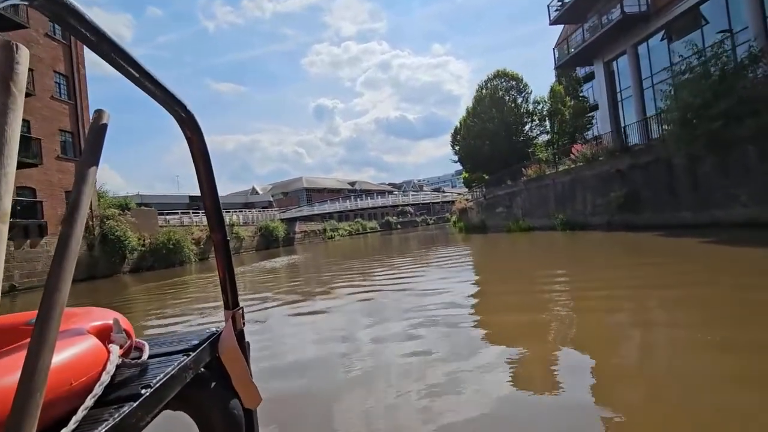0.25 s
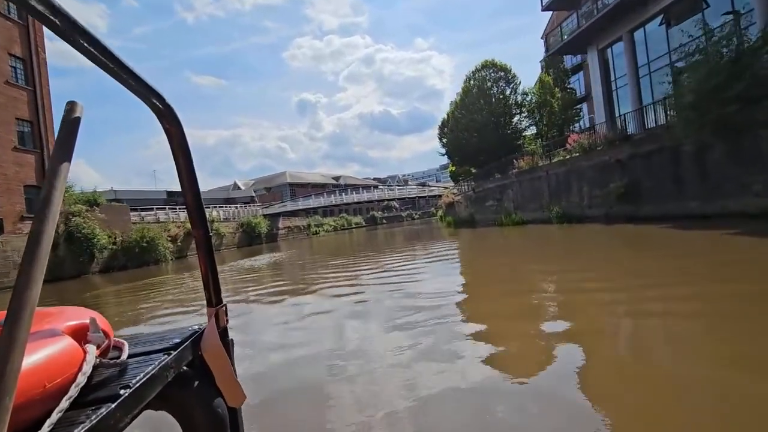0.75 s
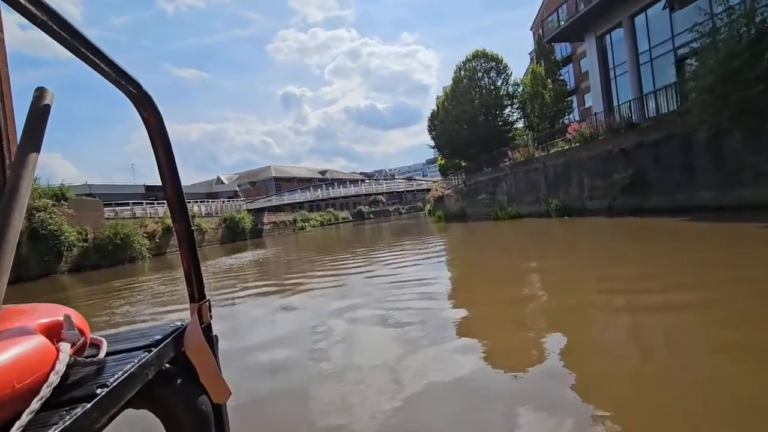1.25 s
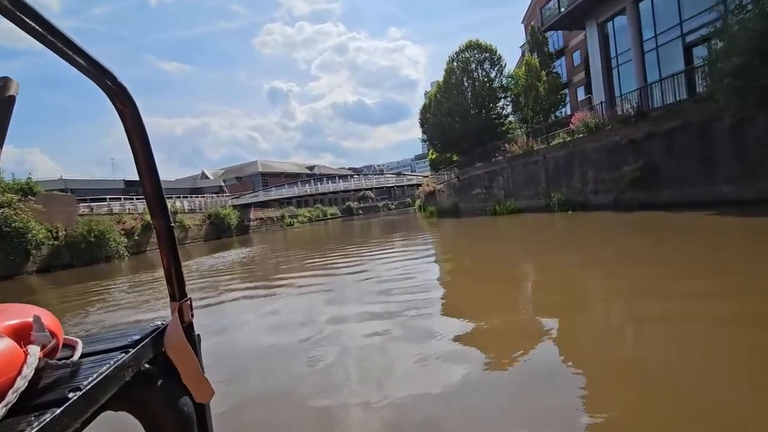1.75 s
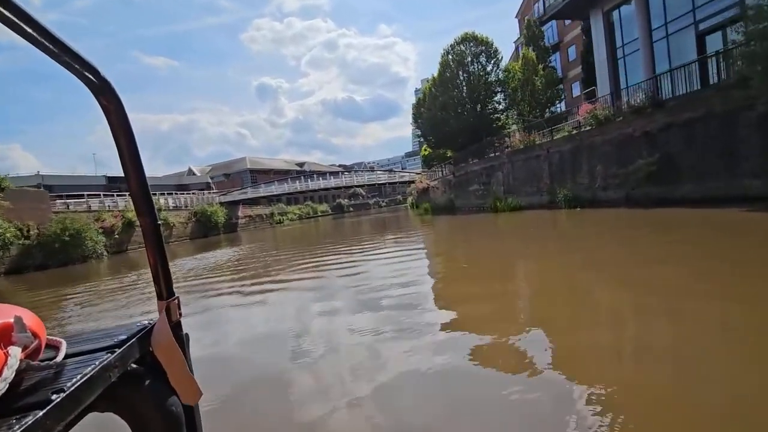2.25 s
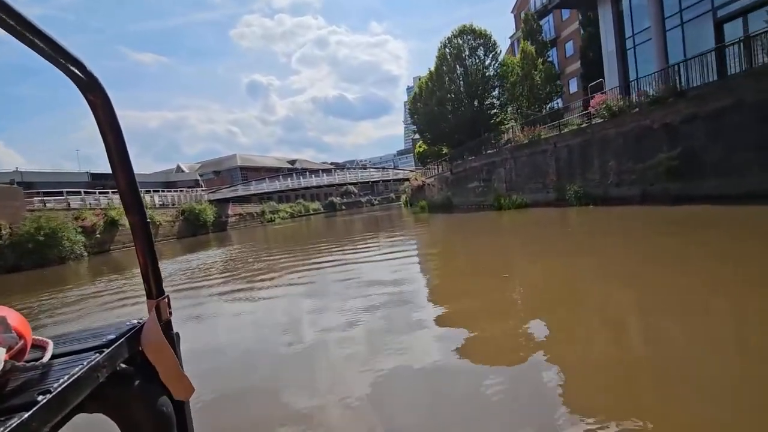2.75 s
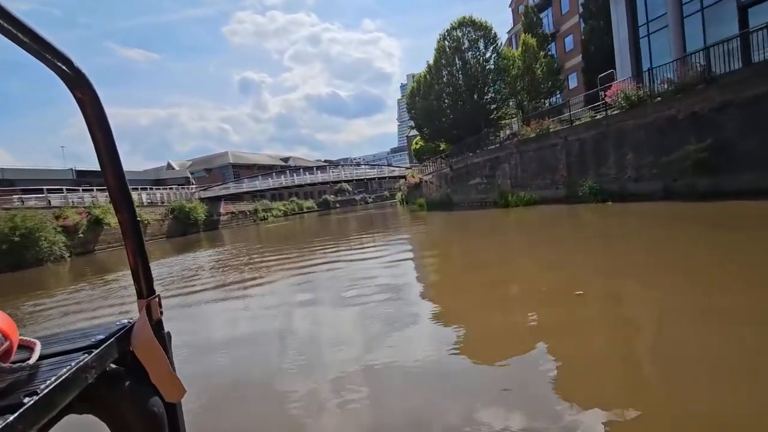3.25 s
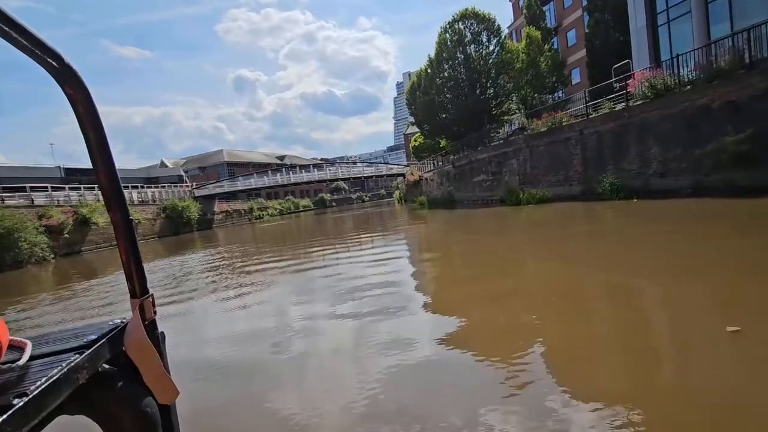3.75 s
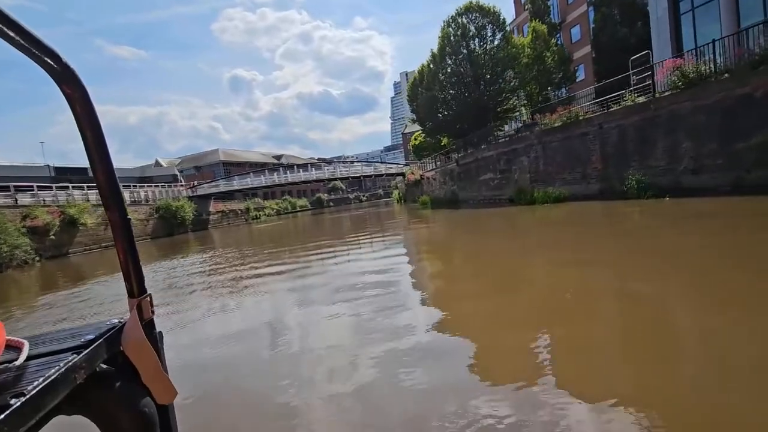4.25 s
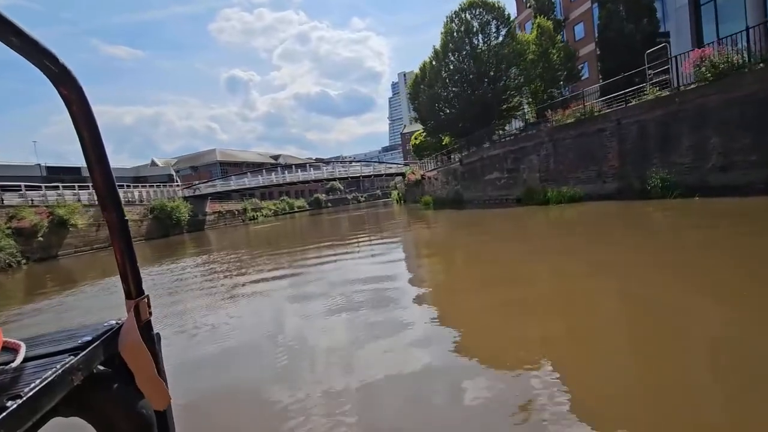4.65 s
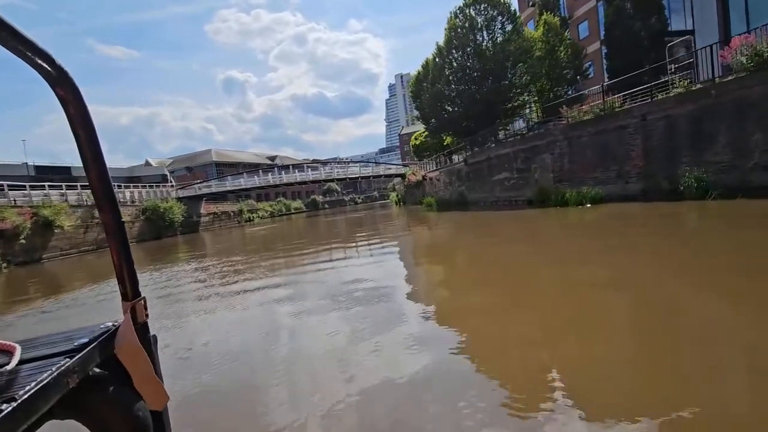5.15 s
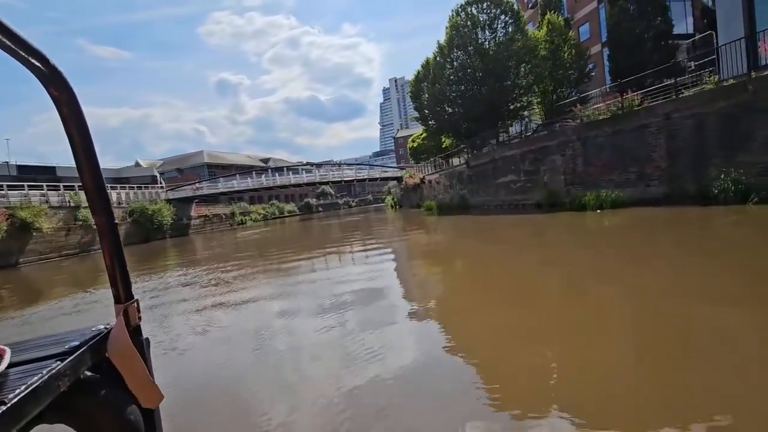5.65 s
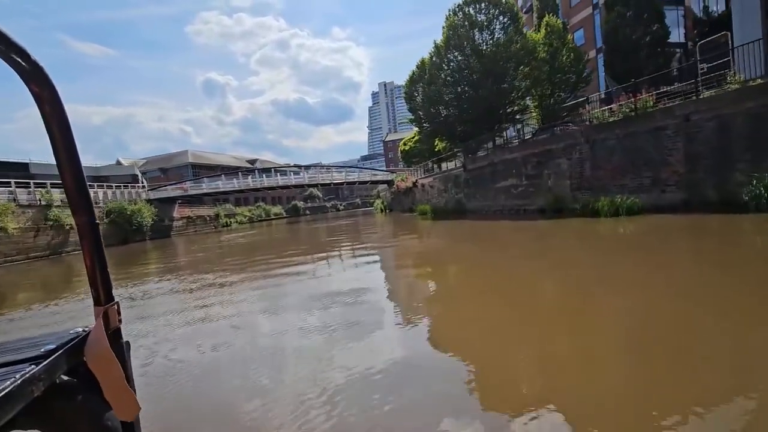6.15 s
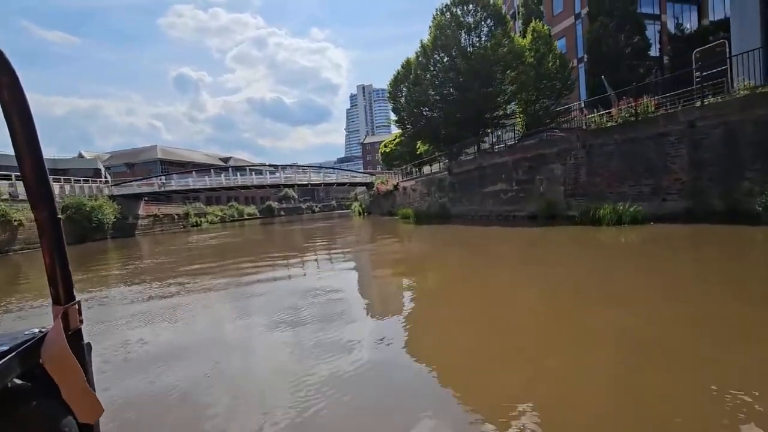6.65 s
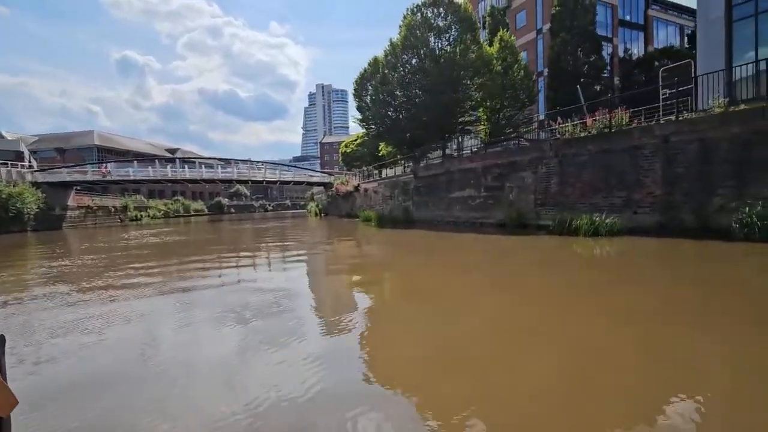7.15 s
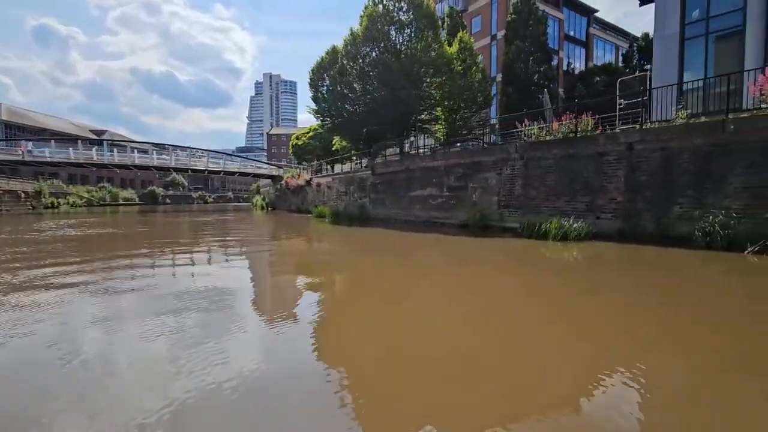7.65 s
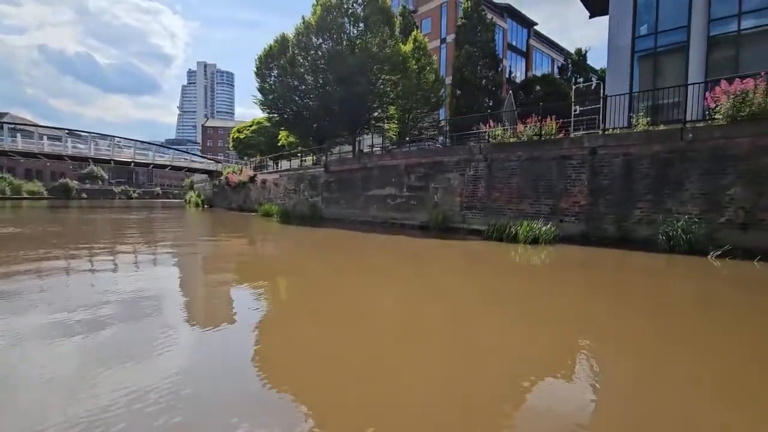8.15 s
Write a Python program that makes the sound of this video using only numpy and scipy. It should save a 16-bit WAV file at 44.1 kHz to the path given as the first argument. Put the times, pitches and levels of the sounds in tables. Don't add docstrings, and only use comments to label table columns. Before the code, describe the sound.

Small diesel boat engine throbbing deeply, swelling in waves for two seconds, then thinning to a steady low chug under water wash and breeze.

```python
import sys
import numpy as np
from scipy import signal
from scipy.fft import rfft, irfft
from scipy.io import wavfile
from scipy.ndimage import uniform_filter1d, minimum_filter1d

SR = 44100
rng = np.random.default_rng(int(sys.argv[2]) if len(sys.argv) > 2 else 0)


def store_wav(level_fs):
    pcm = np.round(np.clip(np.atleast_2d(level_fs), -1, 1) * 32767)
    wavfile.write(sys.argv[1], SR, pcm.T.astype(np.int16))


def makeup_ratio(level_db):
    decades = np.asarray(level_db, float) / 20
    return 10 ** decades


N = 370440

# (time [s], bass gain [dB])
BREEZE = [(0.0, -10), (2.5, -13.5), (3.4, -13.5), (4.0, -12), (5.5, -12.5), (6.5, -12), (8.4, -12)]
# (start [s], end [s], opening [0-1])
LULLS = [(0.0, 0.008, 0.2), (0.062, 0.764, 1.0), (0.834, 0.882, 0.5), (0.995, 1.112, 0.5),
         (1.078, 1.506, 1.04), (1.56, 1.876, 1.0), (1.95, 2.465, 0.92), (3.822, 3.878, 0.1),
         (4.036, 4.113, 0.41), (5.17, 5.24, 0.15), (6.28, 6.378, 0.1), (7.32, 7.39, 0.07),
         (8.12, 8.40, 0.16)]
# (time [s], strength [dB], half length [s])
GUSTS = [(0.17, 3.5, .02), (0.595, 5.5, 0.028), (0.67, 3.5, .03), (0.84, 13, 0.01), (1.66, 3.5, 0.012),
         (1.71, -1.5, 0.0095), (1.825, -5, 0.013), (1.846, 24, 0.0097), (2.56, 2, .025), (2.92, 3, .07),
         (3.22, 4, 0.097), (3.40, 4, 0.038), (4.33, 3, .07), (4.47, 8, 0.022), (4.57, 6, .035),
         (4.90, 2, 0.071), (5.27, 7, 0.036), (5.70, 3, .04), (5.95, 1.5, .07), (6.23, 4, 0.065),
         (6.49, 5, 0.049), (6.73, 2, .05), (7.10, 1.5, 0.054), (7.21, 5, 0.016), (7.76, 3, 0.079),
         (8.07, 2, .035)]
# (frequency [Hz], density [dB per Hz])
WIND_SPECTRUM = [(20, -24), (45, -3), (90, 0), (145, 4), (250, -0.5), (330, -12.5), (500, -11.5),
                 (900, -51), (2000, -70)]
# (time [s], peak [dB], side [above 0 left])
PUFFS = [(0.242, -15, 1.9), (0.345, -17, -1.6), (0.401, -17, -1), (0.493, -16, 15), (0.559, -22, -2.6),
         (0.754, -22, 2.0), (0.836, -21, 1.5), (1.231, -17, 0), (1.499, -13, 5.1), (1.652, -28, -3),
         (1.684, -13.5, 8), (1.719, -13.5, 10.2), (1.749, -21, 1.1), (1.821, -13, 9), (1.834, -16, 16),
         (1.847, -12, 9), (1.862, -25, 6.0), (2.084, -19, 4.1), (2.121, -14, 7.1), (2.152, -18, 2.1),
         (2.185, -19, 1.7), (2.379, -10, 8.4), (2.412, -17, 4.8), (2.442, -20, 6.4), (2.475, -20, -2)]
# (time [s], loss of side [dB], half length [s])
SNAPS = [(0.03, 12, 0.037), (2.55, 9, 0.052), (2.83, 32, 0.036), (3.06, 28, 0.05), (3.39, 26, 0.05),
         (3.88, 30, 0.035), (4.14, 16, .03), (4.49, 8, .03), (4.78, 12, 0.027), (4.96, 7, 0.031),
         (5.16, 14, 0.067), (5.32, 17, 0.045), (5.48, 13, 0.091), (5.76, 16, 0.028), (6.10, 12, 0.042),
         (6.62, 13, 0.065), (6.80, 17, 0.15), (7.06, 12, 0.064), (7.17, 22, 0.028), (7.32, 23, .025),
         (7.46, 16, 0.081), (7.92, 16, .05)]
# (time [s], rush level [dB])
WASH = [(0.0, -37), (2.4, -37.5), (2.9, -38.5), (3.3, -37), (4.25, -36.5), (5.3, -35.5), (5.7, -36.5),
        (6.3, -34.5), (6.75, -37), (6.9, -35), (7.15, -36.5), (7.3, -34.5), (8.2, -37), (8.4, -35.5)]
# (time [s], lift [dB], half length [s])
SLAPS = [
    (0.0, -1, 0.012),
    (2.57, 2.5, 0.061),
    (4.35, 1.5, 0.13),
    (5.54, 3, 0.026),
    (6.32, 4, 0.013),
    (6.42, 1, 0.031),
]
# (frequency [Hz], density [dB per Hz])
RUSH = [(60, 11), (115, 16), (170, -5), (260, 8), (340, -1), (500, -1), (900, -6.5), (1450, -5),
        (1800, -11), (2600, -23), (4000, -36)]
# (frequency [Hz], density [dB per Hz])
SPRAY = [(1400, -4), (2600, 0), (3500, 2.5), (5000, -2), (6200, -5.5), (9000, -9.5), (12000, -12),
         (15800, -14)]
# (frequency [Hz], likeness [0-1])
LIKENESS = [(60, 0.8), (300, 0.9), (640, 0.73), (1000, 0.93), (1410, 0), (3100, 0.016), (15000, 0)]
# (time [s], peak [dB], pitch [Hz], left-right [dB])
PLOPS = [(0.891, -28, 1060, -4.1), (0.998, -30.5, 770, -1), (1.382, -29, 1330, -2.0),
         (1.576, -33, 438, -1.4), (1.843, -28.5, 490, 13), (2.099, -29, 413, -1), (2.403, -36, 450, 1.3),
         (2.557, -27, 1120, 0), (2.798, -32, 1010, -1.3), (3.201, -30, 865, -1), (3.288, -27.5, 1080, -7),
         (3.309, -32, 1053, -1.9), (3.527, -31, 960, -1.6), (3.653, -31, 1250, -2.0),
         (4.353, -32, 695, -1.8), (5.051, -34, 740, -1.7), (5.112, -27.5, 770, -8),
         (5.113, -30, 1460, -4.1), (5.15, -30, 700, -1.4), (5.222, -30, 720, -5), (5.531, -28.5, 795, -6),
         (6.315, -36, 740, -2.2), (6.399, -31, 990, -0.3), (6.437, -27, 475, -2.0),
         (6.468, -27.5, 1010, -4.8), (6.93, -30.6, 570, -1.5), (7.297, -31.5, 810, -2.0),
         (8.115, -27.5, 736, 2), (8.260, -29, 1015, -1.5)]
# (time [s], peak [dB], pitch [Hz], left-right [dB])
DROPS = [
    (0.6774, -20, 4600, -1.0),
    (1.4616, -26, 3760, -1.0),
    (4.5216, -28, 3520, -1.0),
    (5.6101, -24, 3990, -9),
    (5.9618, -30, 3130, 3),
    (6.7196, -29, 3300, 2),
    (7.5118, -27, 3340, -4),
    (7.9997, -30, 3190, 0.0),
]
# (frequency [Hz], width [Hz], level [dB])
PANELS = [(838, 66, -46.5), (1146, 10, -53), (1375, 38, -55), (2010, 126, -48)]
# (time [s], level [dB])
WHINE = [(0.0, -54), (0.18, -52.5), (2.92, -55), (3.72, -52), (6.36, -50.5), (7.39, -54), (7.76, -73),
         (8.4, -61)]
# (time [s], four-stroke cycle rate [Hz])
SPEED = [(0, 12.606), (2.8, 12.601), (3.3, 12.615), (8.4, 12.612)]
# (multiple of cycle rate, level [dB])
EXHAUST = [(4, 1.5), (8, -1), (12, -29.5), (16, -27), (20, -22.5)]
# (multiple of cycle rate, level [dB])
ENGINE_SHAKE = [(3, -31), (5, -29), (6, -31), (7, -22), (9, -33),
                (17, -26), (18, -25.5), (19, -29), (21, -27), (23, -21.5), (24, -27), (25, -28), (27, -29),
         (28, -32), (31, -30.5), (33, -37)]

OPPOSED = np.array([[1], [-1]])
SPLIT_HZ, DUCK_HZ, FOLD_HZ = 223, 447, 1100


def rms_one(x):
    return x / np.sqrt(np.mean(x ** 2) + 1e-20)


def in_time(rows):
    s, *columns = np.transpose(rows)
    return [np.interp(np.arange(N) / SR, s, c) for c in columns]


def at_hz(points, hz):
    point_hz, value = np.transpose(points)
    return np.interp(np.log(hz), np.log(point_hz), value)


def bumps(rows, order=2):
    t = np.arange(0, N + 40, 40) / SR
    total_db = sum(db * np.exp(-((t - s) / half_s) ** order) for s, db, half_s in rows)
    return np.interp(np.arange(N) / SR, t, total_db)


def drift(rate_hz):
    r = np.exp(-80 * np.pi * rate_hz / SR)
    slow = signal.lfilter([1], [1, -2 * r, r * r], rng.standard_normal(N // 40 + 2002))[2000:]
    return np.interp(np.arange(N) / 40, np.arange(len(slow)), rms_one(slow))


def resonate(x, hz, width_hz):
    r = np.exp(-np.pi * width_hz / SR)
    zeros = np.array([1, 0, -1]) * (1 - r * r) / 2
    return signal.lfilter(zeros, [1, -2 * r * np.cos(2 * np.pi * hz / SR), r * r], x)


def below(x, hz):
    return signal.sosfiltfilt(signal.butter(3, hz, fs=SR, output="sos"), x)


def coloured(x, spectrum, span_hz):
    hz = np.maximum(np.arange(N // 2 + 1) * SR / N, 1)
    gain = makeup_ratio(at_hz(spectrum, hz))
    inside = np.sum(gain[(span_hz[0] < hz) & (hz < span_hz[1])] ** 2) / len(hz)
    return irfft(rfft(x) * gain, N) / np.sqrt(inside)


def banded(source, spectrum, span_hz, shared_db, own_db, rate_hz):
    together = drift(rate_hz) + 2.0 * drift(16.0 * rate_hz)
    first_hz, last_hz = spectrum[0][0], spectrum[-1][0]
    edges_hz = first_hz * 2 ** np.arange(0, np.log2(last_hz / first_hz) + .4, .5)
    out = 0
    for k, (low, high) in enumerate(zip(edges_hz, np.minimum(edges_hz[1:], 20000))):
        band = signal.butter(2, [low, high], "band", fs=SR, output="sos")
        mid, side = signal.sosfilt(band, source[k % 2])
        alike = np.clip(at_hz(LIKENESS, np.sqrt(low * high)), 0, .999)
        gain = makeup_ratio(shared_db * together + own_db * drift(3.5 * rate_hz))
        out = out + gain * (np.sqrt(1 + alike) * mid + np.sqrt(1 - alike) * side * OPPOSED)
    return coloured(out, spectrum, span_hz) / np.sqrt(2)


def duck_db():
    open_s, shut_s = 0.07, 0.074
    t = np.arange(N) / SR
    ramps = []
    for start, end, far in LULLS:
        ramp = np.minimum((t - start) / open_s, 1 - (t - end) / shut_s)
        ramps.append(far * np.clip(ramp, 0, 1))
    return in_time(BREEZE)[0] * (1 - np.max(ramps, axis=0)) - bumps(GUSTS)


def swell_db():
    return in_time(WASH)[0] + bumps(SLAPS)


def wind():
    calm_db, roar_per_db, lumpy_db = -41, 0.6031, 3.5
    buffet_db, buffet_hz = -3.5, 90
    noise = coloured(rng.standard_normal((3, N)), WIND_SPECTRUM, (20, 900))
    buffet = makeup_ratio(buffet_db) * rms_one(below(noise[2, ::-1], buffet_hz)) * OPPOSED
    roar_db = calm_db + roar_per_db * np.clip(-duck_db(), 0, 18.0) + lumpy_db * drift(5.6)
    out = makeup_ratio(roar_db) * (noise[:2] * makeup_ratio(1.5 * OPPOSED) + buffet)
    t = np.arange(-1200, 1200)
    for s, level_db, side in PUFFS:
        at = round(s * SR) + t
        puff = noise[2, at] * np.exp(-(t / SR / .009) ** 2)
        out[int(side < 0), at] += makeup_ratio(level_db - 1.5) * puff / np.abs(puff).max()
    return out


def rumble():
    band = signal.butter(2, [36, 95], "band", fs=SR, output="sos")
    noise = signal.sosfilt(band, rng.standard_normal(N))
    gust_db = -.8 * uniform_filter1d(duck_db(), size=9000)
    return makeup_ratio(-33 + gust_db + 0.83 * drift(5.1)) * rms_one(noise)


def crackle(per_s, level_db):
    born = rng.random(N) < per_s * makeup_ratio(3.0 * drift(8.0)) / SR
    sizes = makeup_ratio(3.0 * np.minimum(rng.exponential(1, N), 3)) * born
    fizz = signal.lfilter([1], [1, -.95], sizes) * rng.standard_normal((2, N))
    bright = signal.sosfilt(signal.butter(1, 5000, "high", fs=SR, output="sos"), fizz)
    return makeup_ratio(level_db) * rms_one(below(bright, 14000)) * makeup_ratio(-3.0 * OPPOSED)


def bubbles(table, cycles, rise, trim_db):
    out = np.zeros((2, N))
    for s, level_db, hz, pan_db in table:
        start = round(s * SR)
        t = np.arange(min(round(cycles / hz * SR), N - start)) / SR
        part = t * hz / cycles
        ring = np.sin(2 * np.pi * hz * t * (1 + rise * part)) * makeup_ratio(-60 * part)
        ring = ring * (1 - np.exp(-t * hz))
        out[:, start:start + len(t)] += makeup_ratio(level_db + trim_db + .5 * OPPOSED * pan_db) * ring
    return out


def gurgle(per_s, level_db):
    swell = swell_db()
    born = rng.random(N) < per_s * makeup_ratio(1.5 * (swell - swell.mean()) + 3.0 * drift(7.0)) / SR
    sizes = makeup_ratio(3.0 * np.minimum(rng.exponential(1, N), 3)) * born
    dealt = rng.integers(0, 10, N)
    rings = 0
    for k, hz in enumerate(np.geomspace(450, 1700, 10)):
        ring = resonate(sizes * (dealt == k) + 1e-18, hz, hz / 4.0)
        rings = rings + ring * makeup_ratio(OPPOSED * rng.normal(-.9, 0.5))
    return makeup_ratio(level_db) * rms_one(rings)


def wash():
    spray_below_db, spray_follows = -7.5, 0.67
    rush_db = swell_db()
    spray_db = rush_db.mean() + spray_below_db + spray_follows * (rush_db - rush_db.mean())
    white = rng.standard_normal((2, 2, N))
    rush = banded(white, RUSH, (500, 2500), shared_db=0.12, own_db=1.28, rate_hz=2.8)
    sizes = makeup_ratio(5.5 * np.minimum(rng.exponential(1, (2, N)), 5)) * rng.choice([-1, 1], (2, N))
    grains = rms_one(sizes * (rng.random(N) < 2500 * makeup_ratio(3.0 * drift(12.0)) / SR))
    droplets = white[::-1] + 0.23 * grains
    spray = banded(droplets, SPRAY, (3000, 10000), shared_db=0.54, own_db=0.92, rate_hz=7.0)
    return (makeup_ratio(rush_db - 1.5) * rush + makeup_ratio(spray_db + 1.0) * spray) * makeup_ratio(-.45 * OPPOSED)


def gearbox():
    whine_hz = 1475.5
    angle = 2 * np.pi * whine_hz * np.arange(N) / SR + .9 * drift(3.0)
    whine_db = in_time(WHINE)[0] + 2.2 * drift(10)
    out = np.sqrt(2) * makeup_ratio(whine_db) * np.cos(angle) * makeup_ratio(.7 * OPPOSED)
    mid, side = rng.standard_normal((2, N))
    for hz, width_hz, level_db in PANELS:
        out = out + makeup_ratio(level_db) * rms_one(resonate(mid + 1.21 * side * OPPOSED, hz, width_hz))
    return out


def engine():
    level_db, skew_rad = -18.5, 1.63
    first_firing_cycles = .0345
    angle = 2 * np.pi * (np.cumsum(in_time(SPEED)[0]) / SR - first_firing_cycles)
    tilt_db = -0.1 + 1.5 * drift(3.6) + .5 * np.clip(bumps(GUSTS), 0, 8.0)
    out = 0
    for k, line_db in EXHAUST:
        lean = {4: -.5, 8: .5}.get(k, 0)
        out = out + makeup_ratio(line_db + lean * tilt_db) * np.cos(k * angle + skew_rad)
    shakes = ENGINE_SHAKE
    for (k, line_db), start_rad in zip(shakes, rng.uniform(0, 2 * np.pi, len(shakes))):
        out = out + makeup_ratio(line_db + 1.5 * drift(2.5)) * np.cos(k * angle + start_rad)
    return np.sqrt(2) * makeup_ratio(level_db) * out * makeup_ratio(.1 * OPPOSED)


def scene():
    water = wash() + gurgle(150, -51) + crackle(110, -57.0)
    water = water + bubbles(PLOPS, cycles=32.7, rise=0.36, trim_db=4.7)
    water = water + bubbles(DROPS, cycles=24.0, rise=0.12, trim_db=0.0)
    boat = engine() + gearbox() + rumble() + water
    width_db = 1 + 0.13 * uniform_filter1d(duck_db(), size=4000) + 2 * drift(2.2)
    boat_side = below((boat[0] - boat[1]) / 2, FOLD_HZ)
    wide = boat - (1 - makeup_ratio(width_db)) * boat_side * OPPOSED + wind()
    side = (wide[0] - wide[1]) / 2
    snap_db = -bumps(SNAPS, order=4)
    deep = below(side, SPLIT_HZ)
    upper = below(side, FOLD_HZ) - deep
    lost = (1 - makeup_ratio(snap_db)) * deep + (1 - makeup_ratio(0.55 * snap_db)) * upper
    return wide - lost * OPPOSED


def band_limit(x):
    return signal.sosfilt(signal.butter(12, 15890, fs=SR, output="sos"), x)


def record(dry):
    port_hz, port_width_hz, port_lift = 11460, 320, np.array([[0.12], [2.6]])
    hold_s, lag_s, ceiling = 0.13, 0.19, .66
    sound = dry + port_lift * resonate(dry, port_hz, port_width_hz)
    deep = below(sound, SPLIT_HZ)
    upper = below(sound, DUCK_HZ) - deep
    deep_db = duck_db()
    hold = round(hold_s * SR)
    held_db = -minimum_filter1d(np.maximum(-deep_db, 0), size=hold, origin=(hold - 1) // 2)
    upper_db = 0.5 + 0.62 * uniform_filter1d(held_db, size=round(lag_s * SR))
    upper_db = upper_db - .3 * np.abs(bumps(GUSTS))
    sound = sound - (1 - makeup_ratio(deep_db)) * deep - (1 - makeup_ratio(upper_db)) * upper
    sound = signal.sosfilt(signal.butter(2, 20, "high", fs=SR, output="sos"), sound)
    sound = ceiling * np.tanh((np.abs(sound) / ceiling) ** 3) ** (1 / 3) * np.sign(sound)
    return band_limit(sound)


dry = scene()
out = record(dry)
store_wav(out)
```